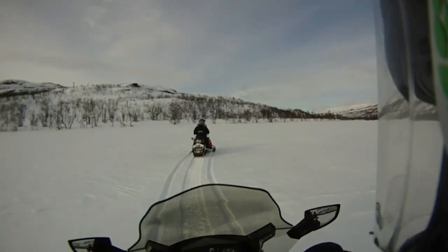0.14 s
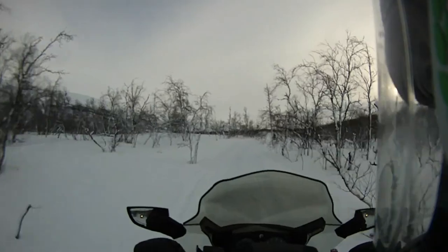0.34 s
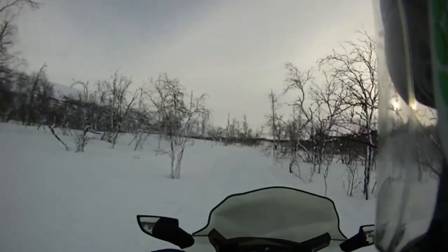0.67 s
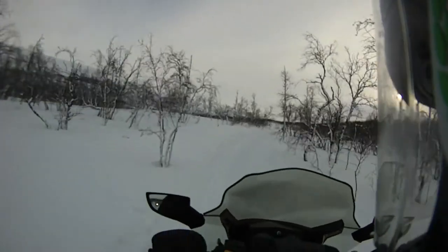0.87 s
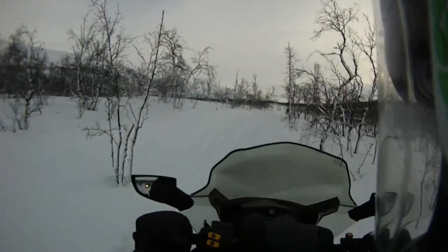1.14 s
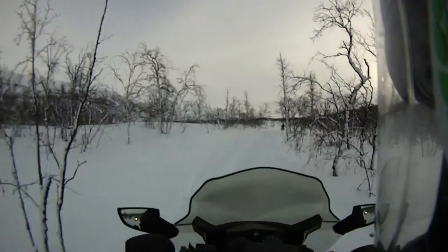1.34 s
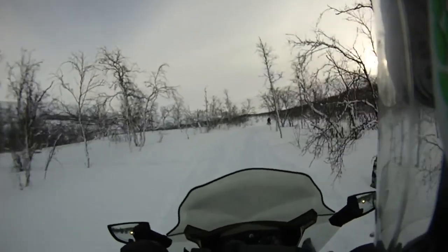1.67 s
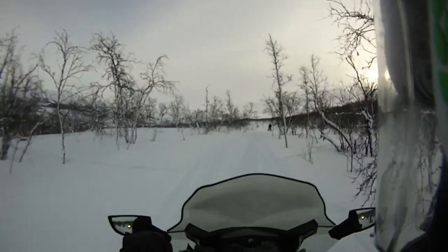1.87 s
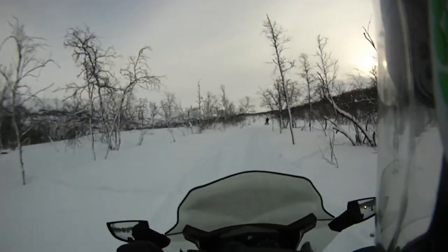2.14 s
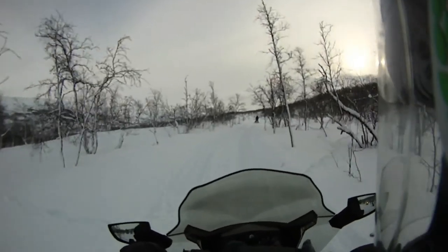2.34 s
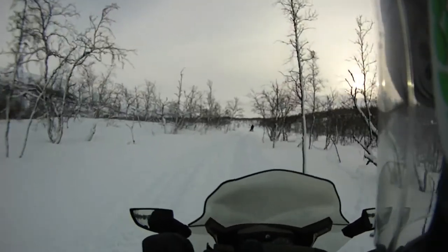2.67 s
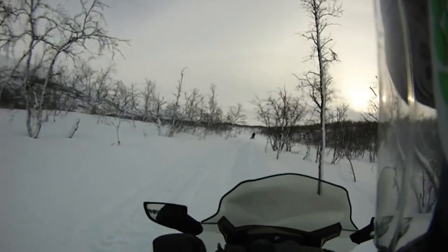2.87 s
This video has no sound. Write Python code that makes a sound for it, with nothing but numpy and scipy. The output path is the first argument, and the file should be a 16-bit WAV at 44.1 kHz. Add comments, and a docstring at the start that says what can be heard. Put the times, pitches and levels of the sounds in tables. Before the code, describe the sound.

Wind buffets the microphone on a moving snowmobile. A low engine throb opens, cutting out at 0.2 seconds into a sharp, close knock. Quick ragged gusts follow, each a hiss breaking into a thump, strongest until about 0.7 seconds, then easing slightly through to 3 seconds. Beneath are rushing air, a faint wavering engine drone and fine crackle. Hollow plastic clacks come near 0.3, 0.6, 0.9, 1.8, 2.3 and 2.7 seconds.

```python
"""Wind buffeting the microphone on a snowmobile ride. The engine first throbs on open snow; the sound
drops out for a moment and returns with a sharp knock on the camera housing. From there, on the trail,
wind tumbles over the windshield in quick ragged gusts, each a hiss that breaks into a thump, over a
rush of air, a faint engine drone, fine crackle and hollow clacks of the bodywork."""
import sys
import numpy as np
from scipy import signal
from scipy.fft import rfft, irfft
from scipy.io import wavfile
from scipy.ndimage import uniform_filter1d

SR = 44100
rng = np.random.default_rng(int(sys.argv[2]) if len(sys.argv) > 2 else 0)


def wav_out(sig):
    """Save sig, one row per channel (or a flat mono array), as 16-bit PCM at SR to the path in sys.argv[1]."""
    wavfile.write(sys.argv[1], SR, np.round(np.clip(np.atleast_2d(sig).T, -1, 1) * 32767).astype(np.int16))


N = 132300


def undb(db):
    """Decibels to gain."""
    return 10 ** (np.asarray(db) / 20)


def unit(x):
    """Scale to rms 1."""
    return x / np.sqrt(np.mean(x ** 2))


def colour(x, eq, size=4096):
    """Minimum-phase EQ through (frequency [Hz], gain [dB]) points."""
    hz, db = np.array(eq, float).T
    bins = np.maximum(np.fft.rfftfreq(size, 1 / SR), 1)
    cepstrum = irfft(np.log(undb(np.interp(np.log(bins), np.log(hz), db))))
    cepstrum[1:size // 2] *= 2
    cepstrum[size // 2 + 1:] = 0
    impulse = irfft(np.exp(rfft(cepstrum)))[:size // 2]
    return signal.fftconvolve(x, impulse)[:len(x)]


def wander(per_s):
    """Random modulator, rms 1, gliding to a new value per_s times a second."""
    hold = int(SR / per_s)
    steps = np.repeat(rng.standard_normal(1500)[:N // hold + 1], hold)
    return unit(uniform_filter1d(steps, hold))[:N]


# Boom of the exhaust (frequency [Hz], gain [dB])
EXHAUST_EQ = [(25, -61), (50, -2), (120, 7), (205, -8), (290, -14), (5000, -110)]
# Swish of the track on snow (frequency [Hz], gain [dB])
TRACK_EQ = [(60, -5), (320, 4.5), (650, -8.5), (1800, -14.5), (2300, -25.5), (8000, -30), (14500, -38)]
FIRING_HZ, ENGINE_DB, TRACK_DB = 50.5, -44.5, -55
THROB_HZ, THROB_PEAK_S, THROB_DB = 14, .056, 8

def cruising(t):
    """Throbbing firings ring the exhaust while the track swishes over open snow."""
    firings = np.diff(np.floor(FIRING_HZ * t + .1), prepend=0)
    throb_db = THROB_DB * np.cos(2 * np.pi * THROB_HZ * (t - THROB_PEAK_S))
    strength = undb(throb_db + rng.standard_normal(N))
    exhaust = unit(colour(firings * strength, EXHAUST_EQ))
    track = unit(colour(rng.standard_normal(N), TRACK_EQ))
    return undb(TRACK_DB) * track - undb(ENGINE_DB) * exhaust


# Thin top-end hiss (frequency [Hz], gain [dB])
SIZZLE_EQ = [(1500, 8.5), (4000, 3), (10500, -2), (11200, 0), (12000, -17)]
SIZZLE_DB, SIZZLE_FADE_DB_PER_S = -76.5, 5

def sizzle(t):
    """A fading hiss with a faint whine, unrelated in the two ears."""
    ears = np.array([unit(colour(rng.standard_normal(N), SIZZLE_EQ)) for ear in range(2)])
    return undb(SIZZLE_DB - SIZZLE_FADE_DB_PER_S * t) * ears


# Brief mutes; the first parts the open snow from the trail (start [s], end [s])
MUTES = [(.2045, .2158), (.3012, .3055), (.4525, .458)]

def dropout_gate(t):
    """A soft-edged gate: the sound drops out for an instant at each mute."""
    gate = np.ones(N)
    for start, end in MUTES:
        gate[(t > start) & (t < end)] = 0
    return uniform_filter1d(uniform_filter1d(gate, size=48), size=48)


def eddies(size, spread_db=4.5):
    """Dense pressure kicks of very uneven strength."""
    return rng.standard_normal(size) * undb(spread_db * rng.standard_normal(size))


# Dark bed of rushing air (frequency [Hz], gain [dB])
RUSH_EQ = [(20, -7.5), (45, 0), (120, -2.5), (230, 1), (500, -5.5), (1000, -13.5), (1600, -20), (3200, -37),
           (6000, -45.5), (14000, -56.5)]
# Fader ride of that bed (time [s], level [dB])
RUSH_FADER = [(.22, -37.5), (.4, -39), (.7, -45.5), (1.9, -46), (3, -47.5)]
RUSH_FLICKER_DB = 2.2

def rush(t):
    """Restless air that eases as the ride goes on."""
    air = colour(eddies(N) * undb(RUSH_FLICKER_DB * wander(per_s=90)), RUSH_EQ)
    return unit(air) * undb(np.interp(t, *np.array(RUSH_FADER).T))


# Engine partials on the trail (harmonic [number], centre level [dB])
DRONE_PARTIALS = [(1, -66), (3, -70)]
DRONE_HZ, DRONE_WAVER, DRONE_SWING_DB = 208, .025, 8.0

def engine_drone():
    """The revving engine wavers faintly in pitch and level under the wind."""
    pitch_hz = DRONE_HZ * (1 + DRONE_WAVER * wander(per_s=10))
    phase = 2 * np.pi * np.cumsum(pitch_hz) / SR
    return sum(np.sqrt(2) * undb(db + DRONE_SWING_DB * wander(per_s=18)) * np.sin(harmonic * phase)
               for harmonic, db in DRONE_PARTIALS)


# Hits of the knock (time [s], ring level [dB], click level [dB])
KNOCK_HITS = [(.2162, -29, -23), (.2188, -9.5, -38), (.227, -16.5, -46)]
# Dead ring of the camera housing (frequency [Hz], 60 dB decay [s], gain [dB])
HOUSING_MODES = [(275, .023, -1.5), (430, .016, -5), (1100, .009, -16)]
CLICK_DECAY_S = 0.000083

def knock(t):
    """A click, a blow and a rebound ring the camera housing."""
    out = np.zeros(N)
    for at, ring_db, click_db in KNOCK_HITS:
        age = np.maximum(t - at, 0)
        ring = sum(undb(db - 60 * age / t60) * np.sin(2 * np.pi * hz * age)
                   for hz, t60, db in HOUSING_MODES)
        click = (t > at) * np.exp(-age / CLICK_DECAY_S)
        out += undb(ring_db) * ring + undb(click_db) * click
    return out


def puffs(cues, eq, fall, spike_s, rise=.52, size=6144):
    """For each (time [s], length [s], peak level [dB]) a swarm of eddies swells and breaks off."""
    out = np.zeros(N + 2 * size)
    t = (np.arange(size) - size // 2) / SR
    for at, length, db in cues:
        from_peak = np.where(t < 0, t / (length * rise), (t / (length * fall)) ** 2)
        envelope = np.exp(-.5 * from_peak ** 2)
        clumps_db = 4 * uniform_filter1d(np.repeat(rng.standard_normal(size // 96), 96), size=24)
        swarm = eddies(size) * envelope * undb(clumps_db)
        spike_share = np.clip(spike_s / length, 0, .9)  # short puffs put their energy in one spike
        swarm *= np.sqrt((1 - spike_share) / np.sum(swarm ** 2))
        swarm[size // 2] += np.sqrt(spike_share)
        puff = colour(swarm, eq)
        peak_rms = np.sqrt(uniform_filter1d(puff ** 2, size=360).max())
        start = int(at * SR) + size // 2
        out[start:start + size] += puff * undb(db) / peak_rms
    return out[size:size + N]


# Gusts on the microphone, before trims (time [s], length [ms], thump level [dB], hiss level [dB])
GUST_CUES = [(0.227,12,-28.5,-53.5), (.254,5.1,-31,-50.5), (0.298,22,-29.5,-52), (0.3079,3.4,-26,-45.5),
             (0.33,17,-36,-55.5), (0.345,7.9,-29,-48.5), (0.355,3.5,-32,-52.5), (0.365,2.7,-32,-60),
             (.413,14.7,-35,-55), (0.448,5.3,-36.5,-53.5), (0.515,15,-35.5,-56), (0.534,14,-44,-50),
             (.560,16,-40,-55), (0.583,10.3,-32.5,-48), (0.616,13,-32,-53.5), (0.673,19.6,-35.5,-58.5),
             (0.699,11,-37.5,-55), (0.742,25,-35,-60.5), (.768,5.1,-32.5,-61), (0.789,7.1,-44,-53),
             (0.832,8.8,-37.5,-54), (0.931,24,-38,-64), (1.001,13,-39.5,-57.5), (1.0119,3.6,-36.5,-56.5),
             (1.043,17,-38,-57.5), (1.080,16,-37,-57.5), (1.146,16,-42.5,-48.5), (1.179,18,-40.5,-57),
             (1.215,33,-40.5,-55.5), (1.249,15,-39,-52.5), (1.275,7.5,-40,-50), (1.308,14.6,-36,-50.5),
             (1.362,9.7,-46,-56), (1.398,17.5,-40,-57.5), (1.433,10.7,-36,-56.5), (1.51,12,-36.5,-53),
             (1.53,10.5,-33.5,-54), (1.605,15.5,-39.5,-54), (1.65,12,-40.5,-67), (1.686,7.1,-49,-59),
             (1.699,20,-39.5,-61.5), (1.821,15.6,-42.5,-46.5), (1.922,7,-37,-61.5), (1.997,8.2,-42,-48.5),
             (2.003,7.5,-47,-54.5), (2.037,8.5,-43,-60), (2.078,19.5,-39.5,-52), (2.148,22,-40.5,-53),
             (2.262,24,-40,-50), (2.33,24,-46.5,-58), (2.352,11,-38,-61), (2.375,15.4,-35,-54.5),
             (2.446,14.5,-39.5,-52.5), (2.489,9.6,-35.5,-64.5), (2.558,16,-38.5,-52.5),
             (2.595,12,-36.5,-54.5), (2.611,3.8,-46,-60), (2.65,12.7,-38.5,-59.5), (2.686,13.4,-38,-59),
             (2.725,1.9,-51,-60), (2.739,19,-38.5,-61), (2.775,17,-40.5,-67.5), (2.859,4.4,-43,-58),
             (2.898,12,-39,-62), (2.953,4,-39,-70), (2.987,16,-45,-69)]
# Low body of a gust (frequency [Hz], gain [dB])
THUMP_EQ = [(20, -15), (60, -2.5), (150, 3.5), (330, -0.5), (520, -9), (800, -18), (4000, -74)]
# Papery mids of a gust (frequency [Hz], gain [dB])
FLUTTER_EQ = [(150, -36), (500, 1), (1000, 1), (1600, -6), (5000, -63.5)]
# Bright edge of a gust (frequency [Hz], gain [dB])
HISS_EQ = [(700, -16.5), (1900, 9), (3600, -3), (5500, -10), (11500, -28.5), (14000, -55)]
THUMP_TRIM_DB, FLUTTER_TRIM_DB, THUMP_LAG_S = 1.5, 1.5, 0.00096
BODY_FALL, HISS_FALL = .52, .36  # release, as a share of the length
BODY_SPIKE_S, HISS_SPIKE_S = .0038, .0016

def gusts():
    """Wind tumbling over the windshield hisses, flutters and ends in a low thump."""
    at, ms, thump_db, hiss_db = np.array(GUST_CUES).T
    length = ms / 1000
    flutter_db = (thump_db + hiss_db) / 2 + FLUTTER_TRIM_DB
    thump_cues = zip(at + THUMP_LAG_S, length, thump_db + THUMP_TRIM_DB)
    thump = puffs(thump_cues, THUMP_EQ, BODY_FALL, BODY_SPIKE_S)
    flutter = puffs(zip(at, length, flutter_db), FLUTTER_EQ, BODY_FALL, BODY_SPIKE_S)
    hiss = puffs(zip(at, length, hiss_db), HISS_EQ, HISS_FALL, HISS_SPIKE_S)
    return thump + flutter + hiss


def crackle(count=42, length_s=.003, loudest_tick_db=-61, pop_boost_db=14):
    """Tiny puffs break at random along the trail, each a tick with a small pop."""
    when, weakness = rng.random((count, 2)).T
    trail_start = MUTES[0][1]
    times = trail_start + when * (N / SR - trail_start)
    cues = [(at, length_s, loudest_tick_db - 10 * weak) for at, weak in zip(times, weakness)]
    ticks = puffs(cues, HISS_EQ, HISS_FALL, HISS_SPIKE_S)
    pops = puffs(cues, FLUTTER_EQ, BODY_FALL, BODY_SPIKE_S)
    return ticks + undb(pop_boost_db) * pops


# Hollow clacks of the bodywork (time [s], pitch [Hz], level [dB])
PANEL_HITS = [(0.3399, 420, -18.5), (0.587, 520, -20.5), (0.9049, 525, -23.5), (1.821, 290, -24),
              (2.265, 360, -22.5), (2.736, 360, -29.5)]

def clacks(t, t60_s=.018):
    """Bumps jolt the plastic panels into short dead rings."""
    out = np.zeros(N)
    for at, hz, db in PANEL_HITS:
        age = np.maximum(t - at, 0)
        out += undb(db - 60 * age / t60_s) * np.sin(2 * np.pi * hz * age)
    return out


# Side channel relative to the mid in a full blast (frequency [Hz], gain [dB])
SIDE_EQ = [(40, -41.5), (1000, -32.5), (4000, -9.5)]
FULL_BLAST_DB, CALM_WIDTH_DB = -32, -16

def stereo_side(mid):
    """The ears differ mainly in the treble, and the image widens in hard blasts."""
    power = uniform_filter1d(mid ** 2, size=2048)
    width = np.clip(power / undb(FULL_BLAST_DB) ** 2, undb(CALM_WIDTH_DB), 1)
    scatter_hz = 150 + 60 * wander(per_s=100)  # ring modulation decorrelates side from mid
    scatter = np.sqrt(2) * np.cos(2 * np.pi * np.cumsum(scatter_hz) / SR)
    return colour(mid * scatter * width, SIDE_EQ)


def scene():
    """Open snow, a dropout and a knock, then the windy trail."""
    t = np.arange(N) / SR
    trail = gusts() + crackle() + clacks(t) + rush(t) + engine_drone()
    gate = dropout_gate(t)
    on_open_snow = t < np.mean(MUTES[0])
    mid = np.where(on_open_snow, cruising(t), trail) * gate + knock(t)
    side = stereo_side(mid)
    return np.array([mid + side, mid - side]) + sizzle(t) * gate


LOW_CUT_HZ, HIGH_CUT_HZ = 20, 13400

def record(dry):
    """The camera cuts the deepest rumble and the top."""
    low_cut = signal.butter(2, LOW_CUT_HZ, "high", fs=SR, output="sos")
    high_cut = signal.ellip(8, .2, 70, HIGH_CUT_HZ, fs=SR, output="sos")
    return signal.sosfilt(high_cut, signal.sosfilt(low_cut, dry))


dry = scene()
out = record(dry)
wav_out(out)
```